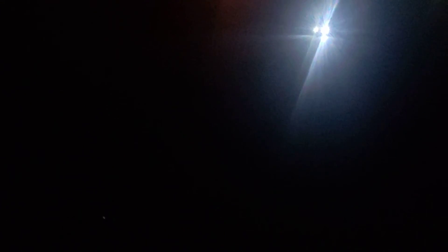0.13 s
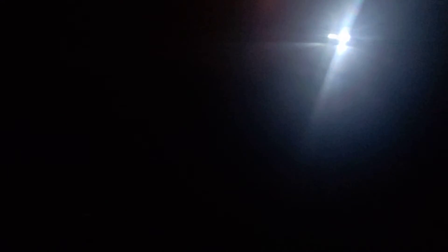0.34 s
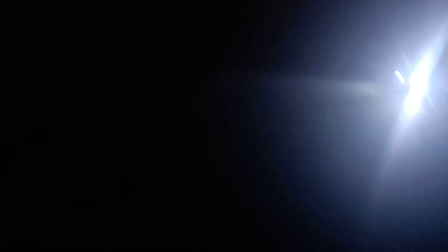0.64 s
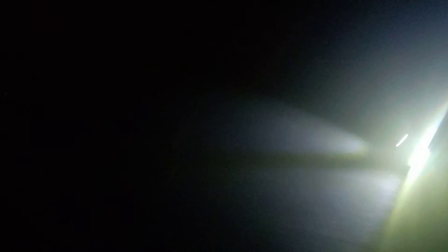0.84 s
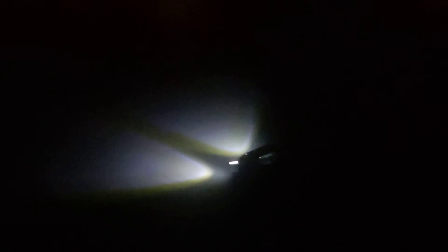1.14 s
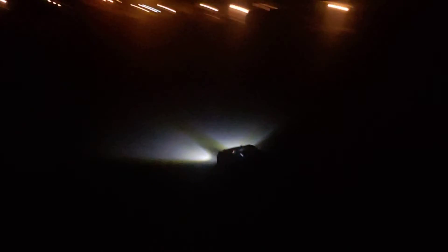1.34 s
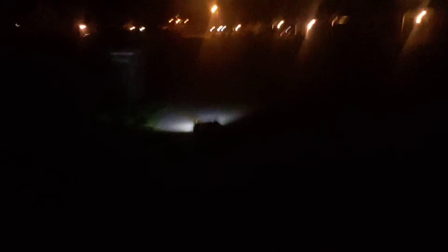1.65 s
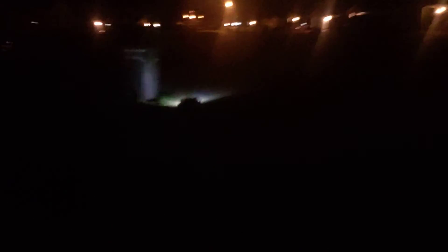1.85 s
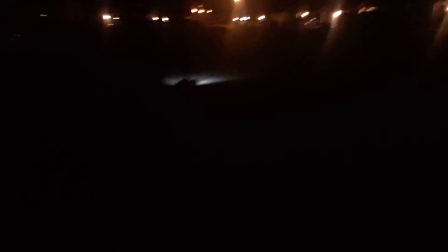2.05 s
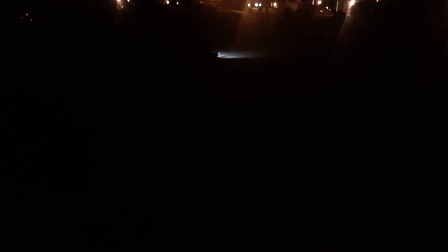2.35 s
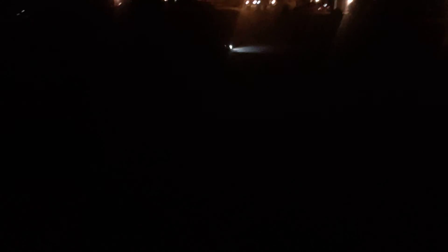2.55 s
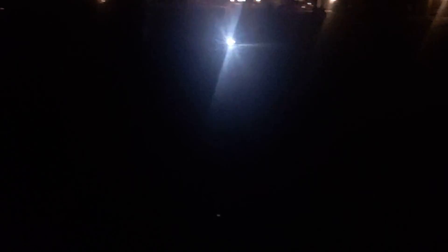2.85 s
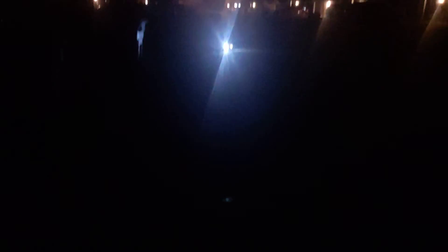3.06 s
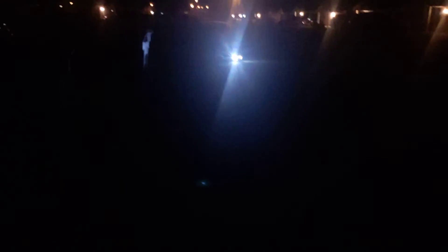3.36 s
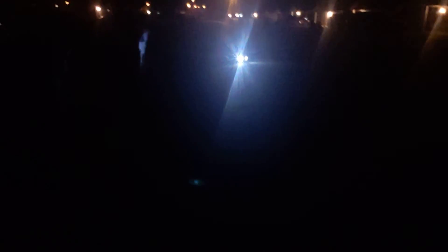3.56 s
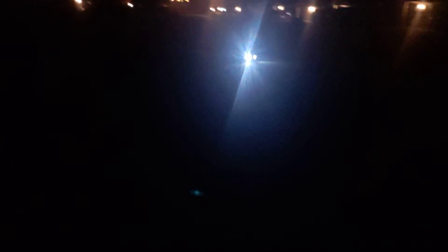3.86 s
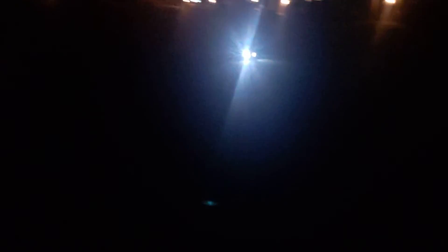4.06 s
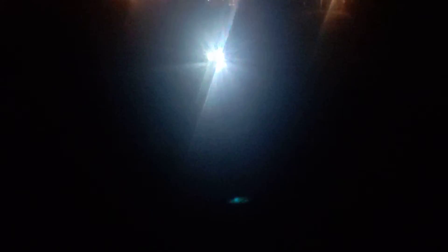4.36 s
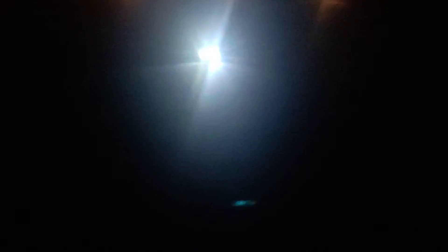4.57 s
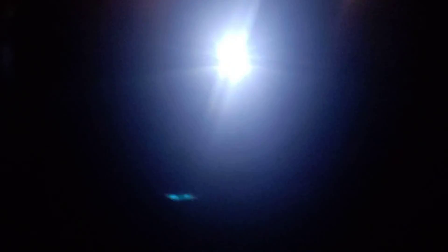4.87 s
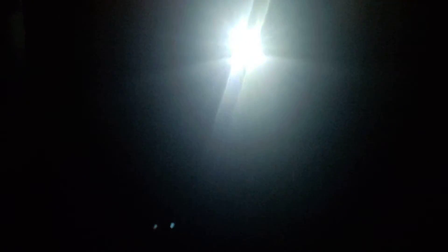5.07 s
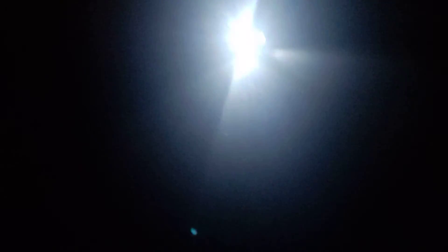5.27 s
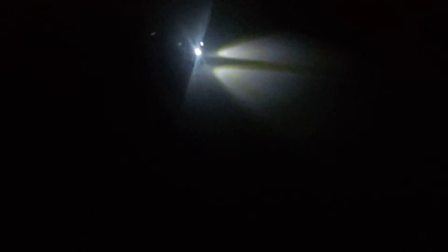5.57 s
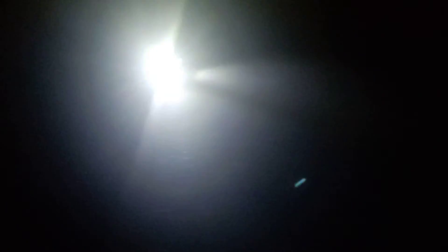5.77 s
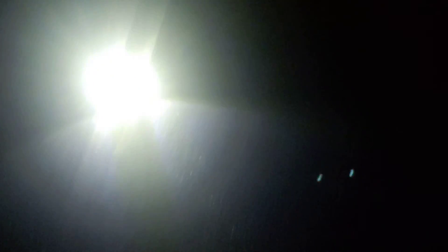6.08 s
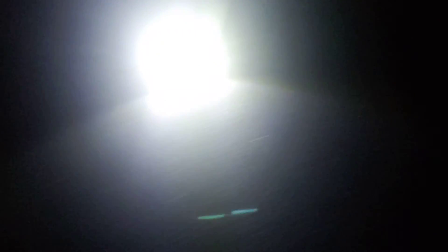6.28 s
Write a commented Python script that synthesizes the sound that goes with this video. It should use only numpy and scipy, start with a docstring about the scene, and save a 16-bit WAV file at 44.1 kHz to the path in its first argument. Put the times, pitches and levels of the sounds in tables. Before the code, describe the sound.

A radio-controlled electric car runs outdoors at night, heard in stereo, leaning left, over faint low town rumble. From 0 to 0.5 s it holds full throttle: a steady, hoarse high gear whine with bright plastic rattle, grit and a faint hum. A hollow trigger knock near the left microphone marks the release; pitch plunges, and around 0.9-1.3 s the car clatters past with hiss and a drumming lid. It recedes, whine gliding down. Knocks and a sharp rev come at 1.7-1.9, a dry crack at 2.0 amid tyre scrub, then the whine sinks to a faint slow whir by 3.0. At 3.2 it revs up, dips at 3.5, and climbs higher, holding until 4.0. It drops into throbbing, chirping, closer coasting. A brief rev peaks near 4.9; skids and juddering scrub follow from 5.2, with low rattling whine continuing to 6.4 and another knock at 6.0.

```python
"""Outdoors at night, a radio-controlled electric car speeds past, turns far off and returns in bursts of
throttle. Gear whine is tones locked to the drive shaft; rattle and clash are random blows ringing plastic
resonances, throbbing once per shaft turn. Coloured specks of noise make the tyre scrub, skids and grit. Trigger
knocks ring a hollow case close to the left microphone, over filtered-noise town rumble; there are also dry
chassis cracks and a trigger click, a drumming lid, a brief hum and faint yard echoes."""
import sys
import numpy as np
from scipy import signal
from scipy.fft import rfft, irfft, next_fast_len
from scipy.io import wavfile
from scipy.ndimage import uniform_filter1d, map_coordinates

SR = 44100
rng = np.random.default_rng(int(sys.argv[2]) if len(sys.argv) > 2 else 0)


def digitize_waveform(pressure):
    """Quantize a signal to 16-bit integers and store it at the path in sys.argv[1].

    Rows of a 2-D input are taken as channels; values are limited to [-1, 1].
    """
    field = np.atleast_2d(pressure).T
    bounded = np.clip(field, -1, 1)
    quanta = np.round(bounded * 32767).astype(np.int16)
    wavfile.write(sys.argv[1], SR, quanta)


N = 283122  # samples

# throttle bursts: pull_s, spin_up_s, held_s, run_down_s, extra rattle_db, whine_db and grit_db, motor_tone_db
BURSTS = [(-.02, 0.024, 0.49, .145, -3, 6, 9, 0), (1.768, 0.13, 0.07, 0.09, 3.5, 3.5, 5.5, -15),
          (3.202, 0.28, .24, .06, 0, -4.5, 4, 0.5), (3.559, .21, 0.433, .11, 4, -2, 4, -4),
          (4.813, 0.11, 0.13, 0.093, 4.5, 0, 3.5, -1)]
# drivetrain speed through passes, coasting and bursts: start_s, spur_tooth_rate_hz
SPEED = [ (.52, 8616), (.562, 7510), (.6, 5960), (.635, 4980), (.7, 4690), (.9, 4360), (1.05, 4150),
         (1.22, 3994), (1.47, 3780), (1.7, 3616), (1.77, 3680), (1.79, 4200), (1.825, 5300), (1.865, 5200),
         (1.89, 4400), (1.94, 3620), (2.0, 3550), (2.33, 2610), (2.45, 2300), (2.5, 2056), (2.56, 1900),
         (2.735, 997), (2.8, 886), (3.0, 424.7), (3.2, 417.6), (3.238, 1500), (3.275, 2580), (3.305, 3540),
         (3.345, 4020), (3.39, 4820), (3.42, 5300), (3.445, 5150), (3.465, 4100), (3.495, 2250),
         (3.54, 1700), (3.565, 2150), (3.595, 2950), (3.635, 4550), (3.655, 5950), (3.705, 7400),
         (3.76, 8400), (3.96, 8400), (4.012, 6700), (4.042, 5850), (4.057, 4600), (4.098, 2750),
         (4.125, 2500), (4.145, 2850), (4.2, 2680), (4.26, 2400), (4.32, 2190), (4.755, 1917), (4.77, 2369),
         (4.788, 2122), (4.838, 3200), (4.853, 4800), (4.9, 6400), (4.925, 7050), (4.957, 7000),
         (4.975, 5600), (5.012, 3900), (5.035, 2700), (5.055, 2624), (5.068, 2307), (5.085, 2688),
         (5.2, 2568), (5.28, 2324), (5.35, 2024), (5.62, 1638), (5.8, 1477), (6.05, 1432), (6.12, 1540),
         (6.2, 1503), (6.42, 1582)]
# nearness of the car: start_s, rattle_level_db at the cruising tooth rate
NEARNESS = [(0, -34), (.55, -35.5), (.8, -38), (1.2, -29), (1.45, -35), (2, -41), (2.8, -40.5), (3.15, -51),
            (3.27, -42.5), (3.6, -42), (4, -40.5), (4.3, -35.5), (4.75, -35), (5.05, -35.5), (5.25, -32),
            (5.65, -32), (6.0, -30.5), (6.42, -32)]
CRUISE_HZ = 4000  # cruising tooth rate
SPEED_LAW_DB = 19  # rise in level for ten times the speed
FLOAT_S, FLOAT_DB = 0.062, -2  # the teeth float free for a moment as each run-down ends
# speed towards the microphones: start_s, speed_m_per_s
APPROACH = [(0, 11.5), (.9, 7.5), (1.3, -8), (2.1, -7), (2.9, 1), (3.3, 1.5), (3.8, 7), (5, 7), (5.5, -1.5),
            (6.42, -2.5)]
SOUND_M_PER_S = 343

# whine partials of each gear: cycles_per_shaft_turn, level_db
SPUR = [(48, 0), (96, -12), (144, -23)]
BEVEL = [(13, -12), (26, 3), (39, 0.5), (52, -13), (65, -8), (78, -11)]
MOTOR = [(24, 2), (48, -6), (72, -4), (96, -7), (120, -11)]
SPUR_TEETH = 48
# how well the gearbox housing radiates a tone: pitch_hz, level_db
HOUSING = [(600, -41), (850, -10), (980, -2), (1170, -6), (1500, 2), (1750, -1.5), (2050, 3), (2550, 2.5),
           (2850, -1), (3150, -5), (3550, -1), (4400, 0), (6000, 4), (7100, 5), (8400, -17)]
# how well the rear axle radiates a tone: pitch_hz, level_db
AXLE = [(500, -30), (950, 0), (1600, -3), (1950, 3), (2060, 3), (2200, -5), (2650, -4), (2950, 1.5),
        (3600, 3), (5200, -3), (8000, -14)]
# brief rises and dips of the spur whine: middle_s, length_s, level_db
WHINE_SWELLS = [(0.582, 0.11, 2), (0.79, .22, 3), (1.45, 0.7, -2), (2.13, .42, -8), (2.36, .08, 4),
                (2.526, 0.12, 9), (2.69, .06, -7), (2.737, 0.034, 3), (2.78, 0.042, 3), (2.84, .08, -8),
                (3.264, .05, 6), (3.32, .08, 3), (3.475, .04, -5), (3.505, .035, 12), (3.535, .04, -10),
                (3.568, 0.031, 6), (4.075, .06, -10), (4.118, 0.056, 10), (4.195, 0.15, 3), (4.39, 0.33, 7),
                (4.58, .26, 4), (4.744, 0.29, 7), (5.038, .036, -12), (5.061, 0.02, 13), (5.077, 0.02, 6),
                (5.222, 0.21, 6), (5.38, 0.26, 7.5), (5.58, .2, 3), (5.755, 0.22, 10), (6.0, .4, 2),
                (6.38, 0.3, -2)]
# the rear axle sings out while the car drives away: middle_s, length_s, level_db
REAR_SWELLS = [(1.45, 2.0, 14), (2.42, .36, 12)]
WHINE_DB, BEVEL_DB, SCRUB_DB = -2.5, -17, -12  # base levels over the rattle
BEVEL_THROTTLE_DB = -19  # added under throttle
MOTOR_DB, MOTOR_STRAIN_DB = -26, 23  # over the rattle; added while spinning up
SLACK_COASTING, SLACK_DRIVEN = 0.58, 0.33  # play between the teeth, 0-1
CHIRP_TURNS, CHIRP_HZ = .008, 2700  # shaft swing at full slack; tooth rate above which it shrinks
HOARSE_HZ, HOARSE_SLOW = 6500, .3  # tooth rate that adds 1 rad of blur; blur of slow teeth in rad

# chassis resonances: pitch_hz, width_hz, level_db, throttle_db
CHASSIS = [(1510, 163, 2.5, 0), (2050, 95, 4.5, -1), (2432, 264, 1, -1), (2985, 300, 1, 1.5),
           (3537, 400, -3.5, 3)]
# gearbox resonances: pitch_hz, width_hz, level_db, throttle_db
GEARBOX = [(3970, 340, 1.5, 1), (4670, 420, 3, -1.5), (5150, 390, 4.5, -2.5), (5570, 360, 1.5, 0),
           (6090, 370, 1.5, 1.5), (6475, 300, 0, 1.5), (6900, 450, 0.5, 4.5)]
PANEL_SWING_DB, PANEL_RATE = 1.3, 7  # rms swing; knots a second
# level of the chassis band within the rattle: start_s, level_db
CHASSIS_LEVEL = [(0, 2), (.6, 4), (1.2, -2.5), (1.9, 0), (2.6, -1.5), (3.3, -0.5), (3.9, -1), (4.5, 1.5),
                 (4.9, 0.5), (5.3, 0.5), (5.8, -2.5), (6.42, -2)]
# treble hiss over the rattle: start_s, level_db
HISS = [(0, -1), (.5, 0), (.9, 11), (1.25, 3), (1.9, 1), (2.2, -1), (2.45, 1.5), (3.1, 3), (3.55, -0.5),
        (4.3, 1.5), (4.6, -1.5), (4.9, 0.5), (5.15, 2), (5.45, 4.5), (5.8, 2.5), (6.42, 0.5)]
CLASH_DB, CLASH_THROTTLE_DB, CLASH_FOLLOWS_HISS = -0.35, -0.2, 0.37  # hard tooth clash over the rattle

# spectra of thrown grit, rolling scrub and skidding: pitch_hz, level_db
GRIT = [(5000, -25), (7500, -5), (8500, -4), (9400, -6), (10600, -1), (11500, -3), (12700, 2), (14300, 0.5),
        (15800, 1.5)]
SCRUB = [(120, -1), (300, -6.5), (600, -4), (800, 0.5), (980, 2), (1250, 1.5), (1800, 2.5), (4000, -54)]
SKID = [(80, -15), (200, -23), (400, 5), (620, 9), (850, -6), (1400, -26), (3000, -43)]
SCRUB_THROTTLE_DB = -5  # under throttle the gears outgrow the tyres
# skids in the turns: middle_s, length_s, scrub_db, low_rasp_db, judder_db
SKIDS = [(1.743, 0.059, -43, -51, -70), (2.013, 0.14, -45, -37, -70), (2.209, 0.93, -62, -57.5, -62),
         (4.92, 0.35, -57, -52.5, -76), (5.382, 0.34, -43, -43.5, -55), (5.535, 0.05, -38.5, -41, -74),
         (5.87, 0.49, -43.5, -65, -48.5), (6.299, 1, -56, -82, -88)]
# tyre carcass resonances: pitch_hz, width_hz, level_db
CARCASS = [(220, 180, 5.5), (394, 260, 2.5)]

# the car's side: start_s, left_lead_ms, left_minus_right_db
LEAD = [(0, -0.099, 4.5), (.35, -0.1, 5), (.95, -0.23, 3.5), (1.35, -0.053, 6), (2.1, 0.051, 5.5),
        (2.6, -0.013, 5.5), (4.1, 0.0028, 5), (4.6, 0.033, 6), (5.25, -0.044, 4.5), (5.6, 0.096, 7.5),
        (6.1, 0.15, 7), (6.42, 0.044, 6.5)]
# colour of the two microphone ports: pitch_hz, left_minus_right_db
PORTS = [(100, -6), (500, -2.5), (1200, -4.5), (2500, -4), (5000, -3), (7200, 1.5), (9000, -7.5),
         (15000, -6.5)]
# stereo likeness by pitch: pitch_hz, left_right_likeness (0-1)
ALIKE = [(50, 0.77), (150, 1), (500, 1), (1200, 0.91), (2500, 0.96), (5000, 0.94), (8000, 0.47),
         (12000, 0.64), (16000, 0.73)]
# decay of the yard echoes: pitch_hz, t60_s
YARD = [(200, 0.12), (2000, 0.057), (12000, 0.084)]
# spectrum of the distant rumble: pitch_hz, level_db
RUMBLE = [(13, -60), (22, -44), (41, -4.5), (64, -2), (79, -4.5), (92, -4), (156, -13.5), (240, -18),
          (264, -20.5), (299, -25.5), (900, -32.5), (1170, -78), (1980, -120)]
# level of the distant rumble: start_s, level_db
TOWN = [(0, -48), (1.3, -51.5), (2.6, -53.5), (4.3, -48), (6.4, -50.5)]
# trigger knocks: start_s, relative level_db, pitch_hz, t60_s, left_minus_right_db
TRIGGER = [(0.534, -35, 378, 0.092, 21), (1.697, -41.5, 589, 0.17, 28), (1.752, -34, 438.6, 0.056, 35),
           (1.814, -32, 371, 0.082, 22), (3.399, -38, 430, 0.064, 20), (3.547, -45, 589.6, 0.2, 21),
           (3.962, -34.5, 390, 0.087, 25), (4.233, -33, 423, 0.084, 29), (4.932, -29, 385.4, 0.084, 31),
           (5.989, -31.5, 423, 0.06, 20)]
PASS_S, PASS_WIDTH_S, LID_DB = 1.1, 0.2, -36  # the close pass, when the lid is heard drumming
# lid resonances: pitch_hz, width_hz, level_db
LID = [(925, 45, 0), (1904, 180, -4.5)]
# stones and suspension ticks, plus a sharp trigger click at 3.5443 s: start_s, relative level_db
TICKS = [(1.9767, -19.5), (2.3287, -32), (2.6556, -40), (3.1726, -43), (3.5443, -31), (4.219, -25),
         (5.053, -40), (5.7834, -28)]
TOP_HZ = 16050  # upper band limit


def amp(db):
    """Decibels to gain."""
    return 10 ** (np.asarray(db) / 20)


def unit(x):
    """Scale to rms 1."""
    return x / np.sqrt(np.mean(x ** 2) + 1e-20)


def along(points, hz):
    """Read (Hz, value) points on a log axis."""
    f, v = np.transpose(points)
    return np.interp(np.log(hz + 1), np.log(f + 1), v)


def curves(rows):
    """One value per sample for each column after the time."""
    s, *cols = np.transpose(rows)
    return [np.interp(np.arange(N) / SR, s, c) for c in cols]


def wobble(rate):
    """A smooth random curve of rms 1, rate knots a second."""
    knots = rng.standard_normal(int(N * rate / SR) + 4)
    return unit(map_coordinates(knots, [np.arange(N) * rate / SR]))


def swell(middle, length):
    """A smooth rise from 0 to 1 and back."""
    progress = (np.arange(N) / SR - middle) / length
    return np.cos(np.pi * np.clip(progress, -.5, .5)) ** 2


def filtered(x, response):
    """Filter x by a response given as a function of frequency."""
    m = next_fast_len(N + SR // 2)
    return irfft(rfft(x, m) * response(np.fft.rfftfreq(m, 1 / SR)), m)[..., :N]


def colour(points):
    """The response of a (Hz, dB) spectrum."""
    return lambda hz: amp(along(points, hz))


def body(modes, low_hz):
    """The response of a few resonances that radiate little below low_hz."""
    def response(f):
        ring = 0
        for k, (centre, width, db) in enumerate(modes):
            damping = 1j * f * width
            ring = ring + (-1) ** k * amp(db) * damping / (centre * centre - f * f + damping)
        return ring * (f / low_hz) ** 4 / (1 + (f / low_hz) ** 4)
    return response


def sides(db):
    """Left and right gains for a level difference."""
    gains = amp(np.array([db, -db]).reshape(2, -1) / 2)
    return gains / np.sqrt(np.mean(gains ** 2, axis=0))


def spread(pair, response):
    """Mix two unrelated signals into a coloured stereo pair of rms 1, most alike in the low mids."""
    def mid_side(hz):
        turn = np.arccos(np.clip(along(ALIKE, hz), -1, 1)) / 2
        return response(hz) * np.array([np.cos(turn), np.sin(turn)])
    mid, side = filtered(pair, mid_side)
    return unit(np.array([mid + side, mid - side]))


def impacts(rate, size_db):
    """Tiny random blows, rate a second, of scattered size."""
    hit = rng.random(N) < rate / SR
    size = amp(size_db * rng.uniform(-1.1, 1, N))
    return unit(hit * size * rng.choice([-1, 1], (2, N)) / np.sqrt(rate))


def echoing(x, tail):
    """Convolve with a response drawn anew for each overlapping stretch of sound."""
    hop = SR // 7
    padded, out = np.pad(x, ((0, 0), (hop, 2 * hop))), np.zeros((2, N + 2 * SR))
    fade = signal.windows.cosine(2 * hop)
    for i in range(0, N + hop, hop):
        part = signal.fftconvolve(padded[:, i:i + 2 * hop] * fade, tail(), axes=1)
        out[:, i:i + part.shape[1]] += part
    return out[:, hop:hop + N]


def motion():
    """Each burst of throttle loads the gears and lets them go; faster and nearer is louder."""
    t = np.arange(N) / SR
    mesh_hz, near_db = curves(SPEED)[0], curves(NEARNESS)[0]
    throttle, floating = np.zeros(N), np.zeros(N)
    motor_db, extra_db = np.full(N, MOTOR_DB, float), np.zeros((3, N))
    for pull, spin_up, held, run_down, *extras, tone_db in BURSTS:
        progress = np.clip((t - pull) / spin_up, 0, 1)
        release = np.cos(np.pi / 2 * np.clip((t - pull - held) / run_down, 0, 1)) ** 2
        drive = np.sin(np.pi / 2 * progress) * release
        extra_db += np.outer(extras, drive)
        throttle += drive
        # the motor sings while it is still gaining speed
        strain = np.minimum(10 * progress, 1) * (1 - progress ** 20) * release
        motor_db += (MOTOR_STRAIN_DB + tone_db) * strain
        floating += swell(pull + held + run_down - FLOAT_S / 4, FLOAT_S)
    speed_db = SPEED_LAW_DB * np.log10(mesh_hz / CRUISE_HZ)
    rattle_db = near_db + speed_db + extra_db[0] + FLOAT_DB * floating
    return mesh_hz, rattle_db, throttle, motor_db, extra_db[1], extra_db[2]


def whine(turns, partials, radiation, blur, blur_rate, fade_db):
    """Shaft-locked tones sweep casing resonances; backlash blurs them, lost tooth contact breaks them up."""
    out, shaft_hz = np.zeros((2, N)), np.abs(np.gradient(turns)) * SR
    apart = 0.42 * wobble(14) * np.array([[1], [-1]])  # left-right phase, rad
    for cycles, db in partials:
        phase = 2 * np.pi * cycles * turns + blur * wobble(blur_rate)
        contact = np.minimum(wobble(55), .8)
        level_db = db + along(radiation, cycles * shaft_hz) + fade_db * contact
        out += amp(level_db) * np.sin(phase + apart)
    return out / np.sqrt(sum(amp(db) ** 2 for _, db in partials) / 2)


def shell(x, t60, ring_db):
    """The thin plastic body adds many close, short-lived modes to whatever shakes it."""
    decay = amp(-60 * np.arange(SR // 20) / SR / t60)

    def tail():
        return rng.standard_normal((1, len(decay))) * decay / np.linalg.norm(decay)
    return x + amp(ring_db) * echoing(x, tail)


def panels(blows, modes, throttle, low_hz):
    """Resonances swell and fade with load and as the car rocks; approach raises their pitch, leaving lowers it."""
    ring = 0
    for k, (*mode, load_db) in enumerate(modes):
        swing_db = load_db * throttle + PANEL_SWING_DB * wobble(PANEL_RATE)
        ring = ring + (-1) ** k * amp(swing_db) * filtered(blows, body([mode], low_hz))
    clock = np.cumsum(1 + curves(APPROACH)[0] / SOUND_M_PER_S)
    shifted = np.array([map_coordinates(channel, [clock], mode="mirror") for channel in ring])
    return spread(shifted, np.ones_like)


def drivetrain(mesh_hz, rattle_db, throttle, motor_db, extra_whine_db, extra_grit_db):
    """Gear teeth sing and clatter; the slightly eccentric spur presses harder once a turn."""
    hiss_db = curves(HISS)[0]
    grit_db = hiss_db + extra_grit_db
    clash_db = CLASH_DB + CLASH_THROTTLE_DB * throttle + CLASH_FOLLOWS_HISS * hiss_db
    whine_swell_db = sum(db * swell(s, length) for s, length, db in WHINE_SWELLS)
    whine_db = rattle_db + WHINE_DB + extra_whine_db + whine_swell_db
    rear_db = sum(db * swell(s, length) for s, length, db in REAR_SWELLS)
    bevel_db = BEVEL_DB + BEVEL_THROTTLE_DB * throttle + rear_db
    slack = SLACK_COASTING + (SLACK_DRIVEN - SLACK_COASTING) * throttle
    turns = np.cumsum(mesh_hz * (1 + 0.0053 * wobble(60))) / SPUR_TEETH / SR
    # slack gears throb most while the car coasts
    press = np.clip(slack, 0, 1) * (np.cos(2 * np.pi * turns) + .3 * wobble(90))

    def throb(depth_db):
        """Pulse with tooth pressure, holding the running power steady."""
        pulse = amp(depth_db * press)
        return pulse / np.sqrt(uniform_filter1d(pulse ** 2, size=4096))

    def ringing(x):
        """Let the plastic body ring after the blows."""
        return shell(x, t60=.035, ring_db=-5.5)

    def blows():
        """Tooth strikes, more frequent in faster gears."""
        return ringing(impacts(900 + .7 * mesh_hz, size_db=4.0))

    bumps = amp(1.42 * wobble(28))
    # the tight spot also slows the teeth, so each throb chirps
    chirp = CHIRP_TURNS * slack * np.minimum(1, (CHIRP_HZ / mesh_hz) ** 2)
    spur_turns = turns + chirp * np.cos(2 * np.pi * turns)
    # fast teeth bounce and sing more hoarsely
    hoarse = HOARSE_SLOW + (mesh_hz / HOARSE_HZ) ** 3
    spur = whine(spur_turns, SPUR, HOUSING, blur=hoarse, blur_rate=700, fade_db=2.6)
    spur = shell(amp(whine_db) * throb(depth_db=8) * spur, t60=.03, ring_db=-10)
    bevel = whine(turns, BEVEL, AXLE, blur=.5, blur_rate=170, fade_db=3.5)
    bevel = amp(rattle_db + bevel_db) * bevel
    motor = whine(turns, MOTOR, HOUSING, blur=.7, blur_rate=500, fade_db=4.2)
    motor = amp(rattle_db + motor_db) * motor
    jolts = throb(depth_db=2) * bumps
    rattle = jolts * panels(blows(), CHASSIS, throttle, low_hz=1200)
    rattle = amp(rattle_db + curves(CHASSIS_LEVEL)[0]) * rattle
    clash = jolts * panels(blows(), GEARBOX, throttle, low_hz=2760)
    clash = amp(rattle_db + clash_db) * clash
    specks = impacts(5000 + mesh_hz, size_db=8.5) * throb(depth_db=3.0)
    spray = ringing(specks) * amp(1.5 * wobble(35))
    grit = amp(rattle_db + grit_db) * spread(spray, colour(GRIT))
    return spur + motor + bevel + rattle + clash + grit


def tyres(rattle_db):
    """Tread scrubs over the ground with speed; in a skid it scrubs harder, rasps lower and judders."""
    skid_levels = sum(np.outer(amp(levels_db), swell(s, length)) for s, length, *levels_db in SKIDS)
    skid_scrub, slide, judder = skid_levels
    scrub_level = amp(rattle_db + SCRUB_DB) + skid_scrub
    scrub = scrub_level * spread(impacts(2500, size_db=6.5), colour(SCRUB))
    slide = slide * spread(impacts(700, size_db=6.0), colour(SKID))
    judder = judder * spread(impacts(300, size_db=14), body(CARCASS, low_hz=150.5))
    return scrub + (slide + judder) * sides(db=-0.5)


def microphones(car):
    """The car reaches the two microphones at different times and levels; each port has its own colour."""
    lead_ms, pan_db = curves(LEAD)
    shift = lead_ms / 1000 * SR / 2  # half the lead on each side, in samples
    heard = [map_coordinates(channel, [np.arange(N) + way * shift], order=5)
             for channel, way in zip(car, (1, -1))]
    return filtered(np.array(heard) * sides(pan_db), lambda hz: sides(along(PORTS, hz)))


def yard(x):
    """Faint scattered echoes from walls and ground, as decaying noise."""
    def tail():
        hz, t, z = signal.stft(rng.standard_normal((2, SR // 6)), SR, nperseg=256)
        decay = amp(-60 * t / along(YARD, hz)[:, None])
        echo = signal.istft(z * decay, SR, nperseg=256)[1]
        return echo / np.linalg.norm(echo[0])
    return echoing(x, tail)


def hum(hz=463):
    """A faint, slightly wavering sine hum while the opening throttle is held wide open."""
    level_db = curves([(0, -58.5), (.52, -57), (.56, -120)])[0]
    tone = np.sqrt(2) * np.sin(2 * np.pi * hz * np.arange(N) / SR + 0.47 * wobble(24))
    return amp(level_db) * sides(db=0.5) * tone


def outdoors():
    """A low, uneven rumble of distant town, with light air stirring at each port."""
    air = rng.standard_normal(N) + .65 * rng.standard_normal((2, N))  # shared, then separate
    level_db = curves(TOWN)[0] + 2.93 * wobble(7.12)
    return amp(level_db) * unit(filtered(air, colour(RUMBLE)))


def trigger(attack=0.0026, click_t60=0.081):
    """Each pull or release of the trigger knocks the hollow transmitter case: two ringing modes and a click."""
    rings, clicks, t = np.zeros((2, N + SR)), np.zeros(N + SR), np.arange(SR // 4) / SR
    for s, db, hz, t60, pan_db in TRIGGER:
        start = round(s * SR)
        case = np.sin(2 * np.pi * hz * t) * amp(-60 * t / t60)
        case += .35 * np.sin(2 * np.pi * 3.05 * hz * t) * amp(-60 * t / .04)
        onset = 1 - np.exp(-t / attack)
        rings[:, start:][:, :len(t)] += amp(db + 5.5) * sides(pan_db) * case * onset
        clicks[start:][:len(t)] += amp(db + 5.0 - 60 * t / click_t60) * rng.standard_normal(len(t))
    click_colour = colour([(100, -73), (350, 10.0), (1200, 1.5), (3000, -7.0)])
    return rings[:, :N] + sides(db=17) * filtered(clicks[:N], click_colour)


def lid():
    """Bumps in the ground drum on the flat body shell, heard only as the car passes close by."""
    close = 1 / (1 + ((np.arange(N) / SR - PASS_S) / PASS_WIDTH_S) ** 4)
    return amp(LID_DB) * close * spread(impacts(900, size_db=12.0), body(LID, low_hz=750))


def ticks(t60=0.05):
    """Short dry cracks from the chassis, and one click of the trigger, as decaying noise."""
    out, t = np.zeros((2, N + SR)), np.arange(SR // 8) / SR
    for s, db in TICKS:
        crack = amp(db - 9 - 60 * t / t60) * rng.standard_normal(len(t))
        out[:, round(s * SR):][:, :len(t)] += crack
    return filtered(out[:, :N], colour([(500, -5), (1800, 1.0), (7000, -2), (15000, 2)]))


def scene():
    """The moving car, its echoes, the trigger, the hum and the night air."""
    mesh_hz, rattle_db, throttle, motor_db, extra_whine_db, extra_grit_db = motion()
    gears = drivetrain(mesh_hz, rattle_db, throttle, motor_db, extra_whine_db, extra_grit_db)
    tread = tyres(rattle_db + SCRUB_THROTTLE_DB * throttle)
    car = microphones(gears + tread + lid() + ticks())
    return car + amp(-9.0) * yard(car) + trigger() + hum() + outdoors()


def record(dry):
    """Remove everything from the upper band limit up."""
    return filtered(dry, lambda hz: hz < TOP_HZ)


dry = scene()
out = record(dry)
digitize_waveform(out)
```